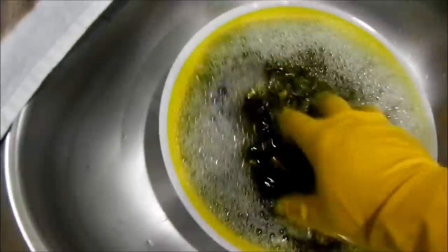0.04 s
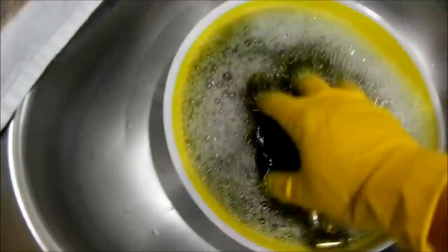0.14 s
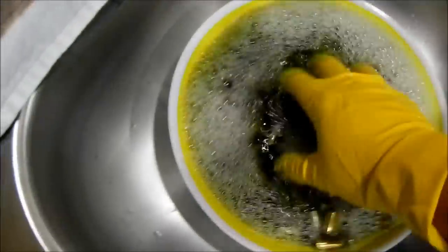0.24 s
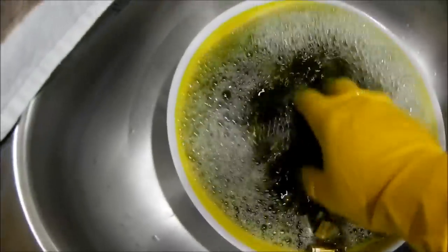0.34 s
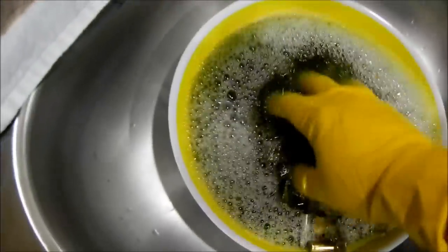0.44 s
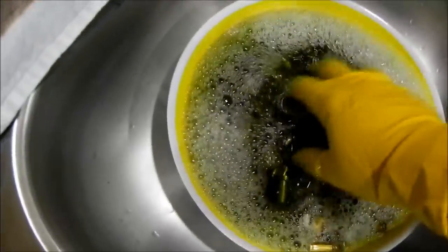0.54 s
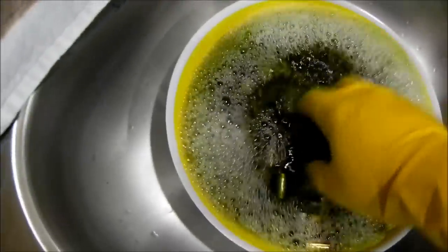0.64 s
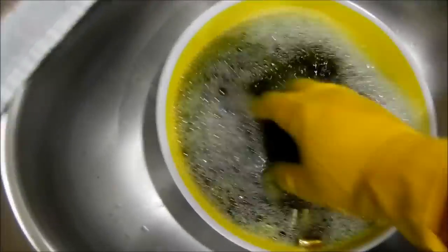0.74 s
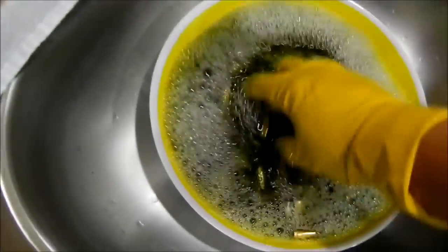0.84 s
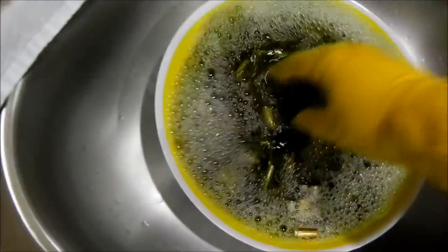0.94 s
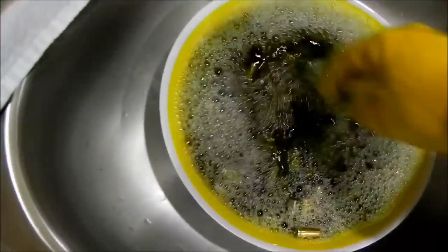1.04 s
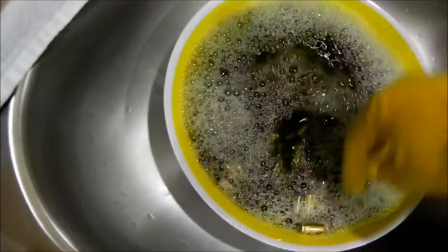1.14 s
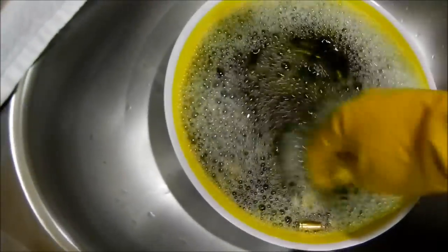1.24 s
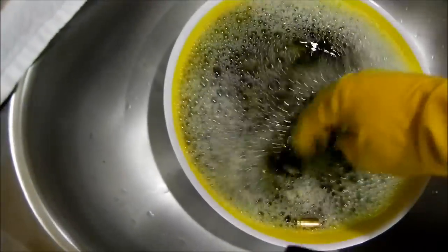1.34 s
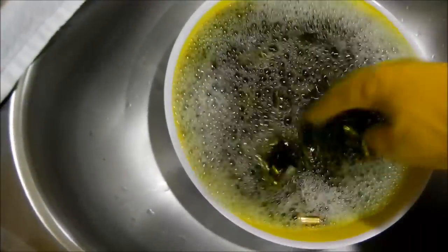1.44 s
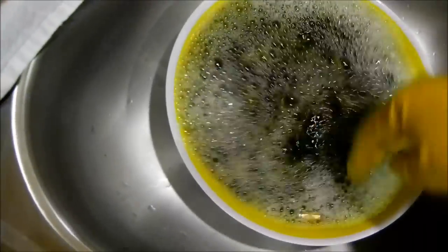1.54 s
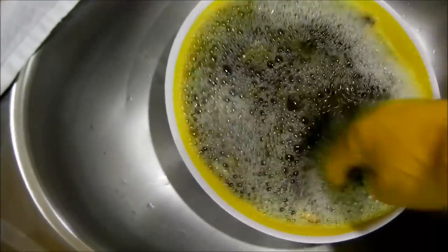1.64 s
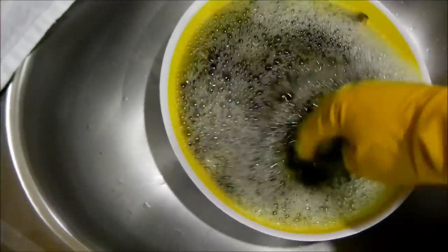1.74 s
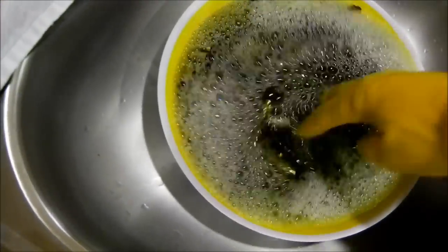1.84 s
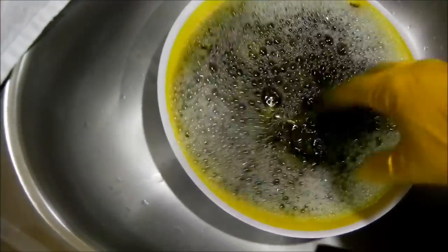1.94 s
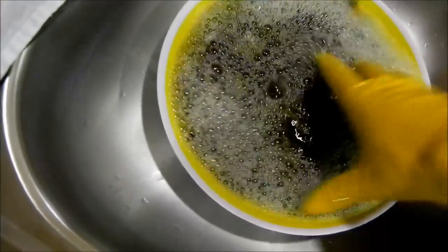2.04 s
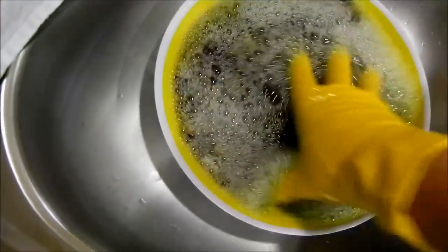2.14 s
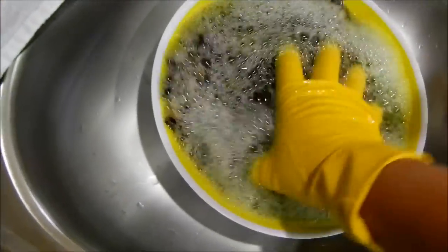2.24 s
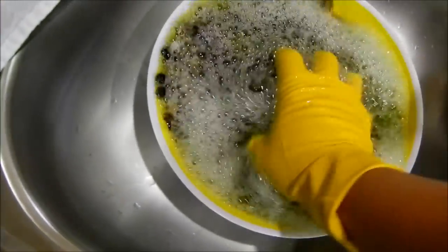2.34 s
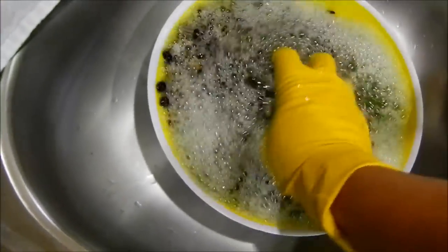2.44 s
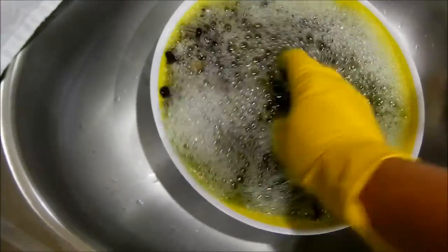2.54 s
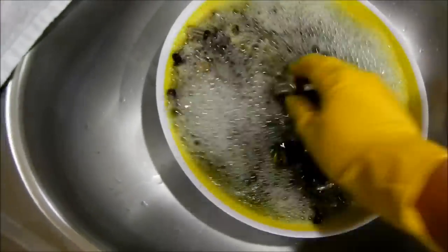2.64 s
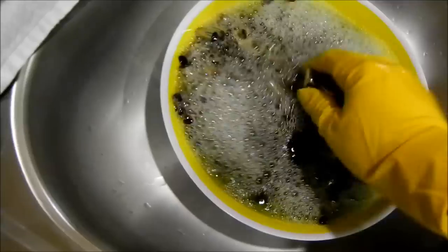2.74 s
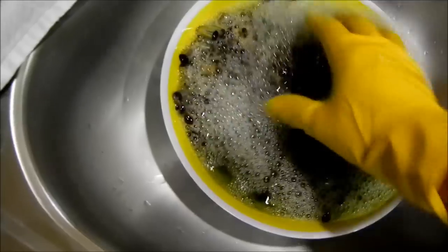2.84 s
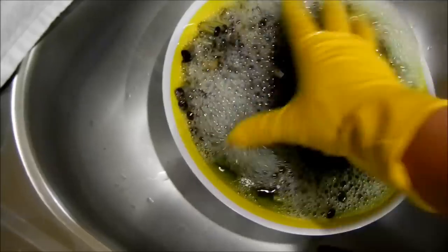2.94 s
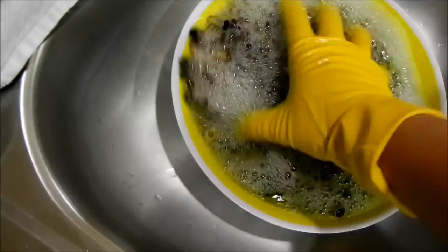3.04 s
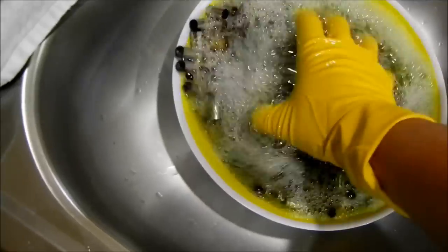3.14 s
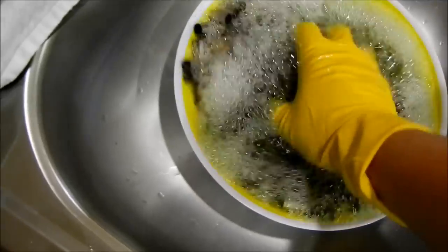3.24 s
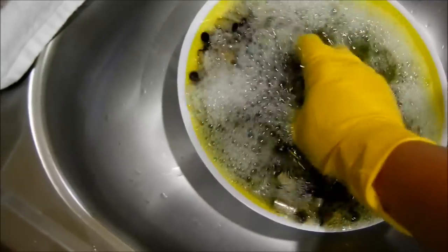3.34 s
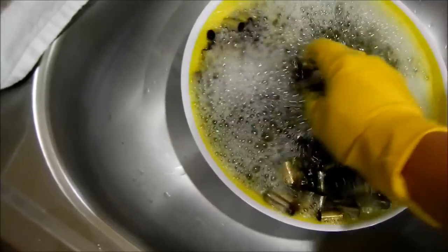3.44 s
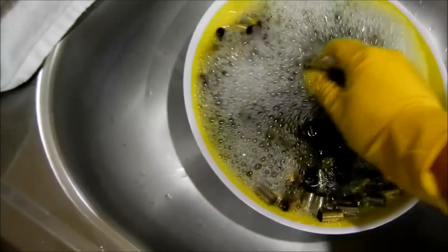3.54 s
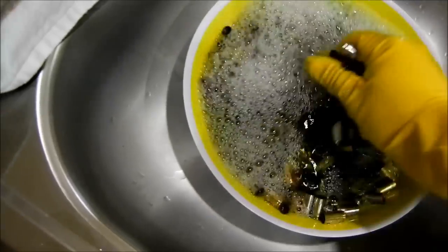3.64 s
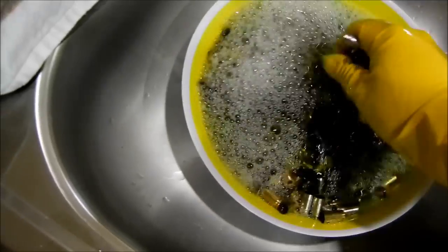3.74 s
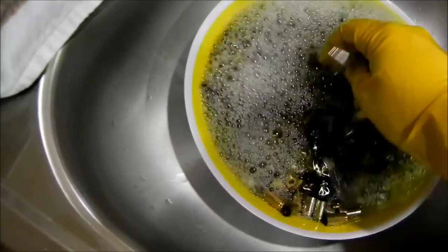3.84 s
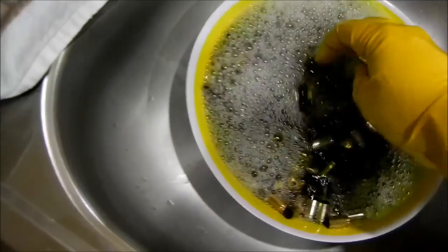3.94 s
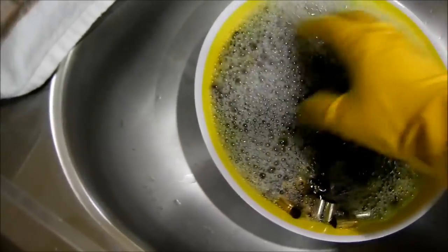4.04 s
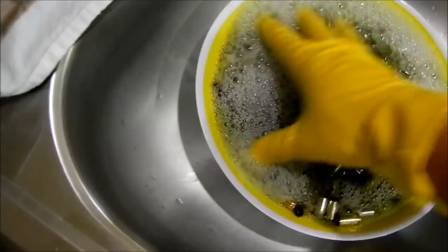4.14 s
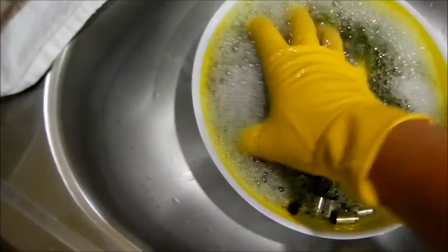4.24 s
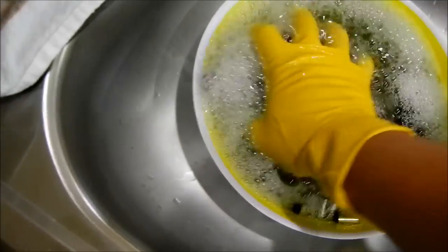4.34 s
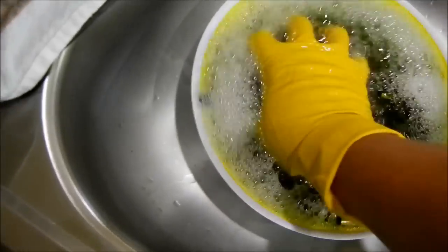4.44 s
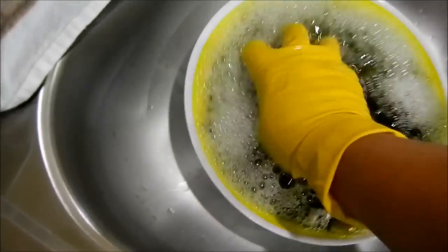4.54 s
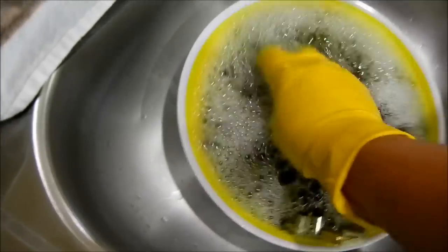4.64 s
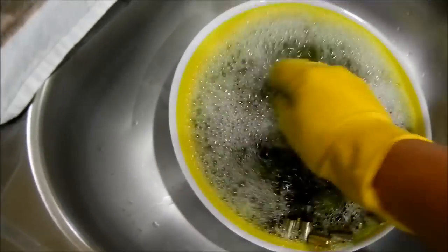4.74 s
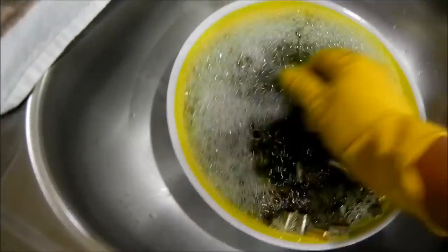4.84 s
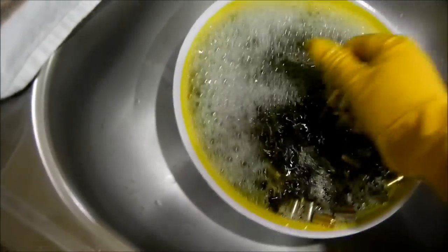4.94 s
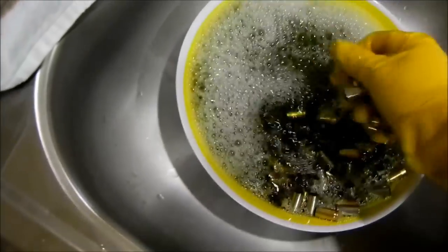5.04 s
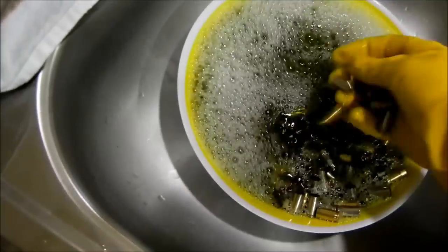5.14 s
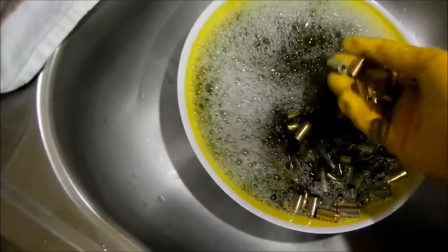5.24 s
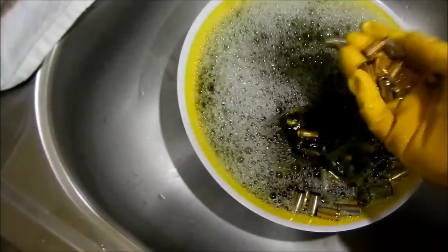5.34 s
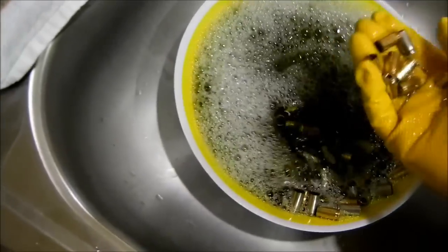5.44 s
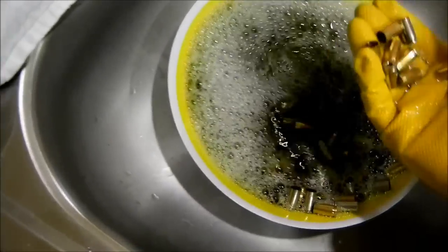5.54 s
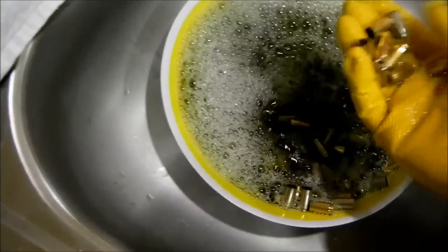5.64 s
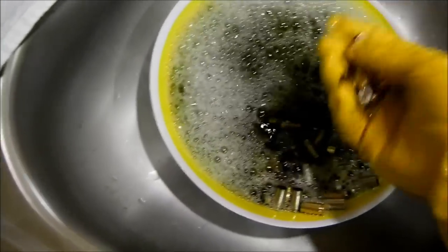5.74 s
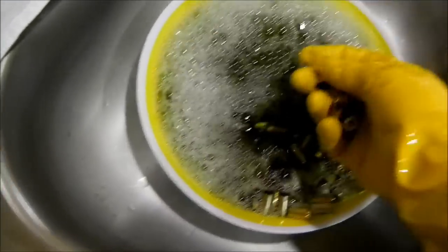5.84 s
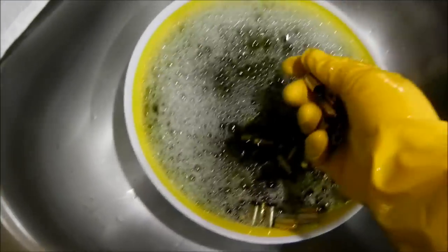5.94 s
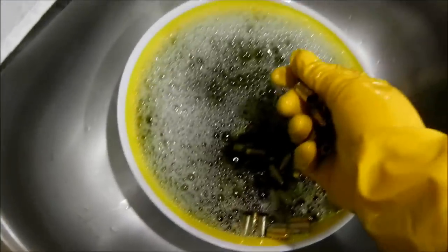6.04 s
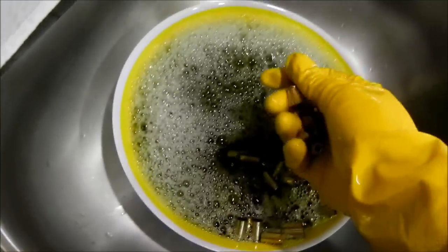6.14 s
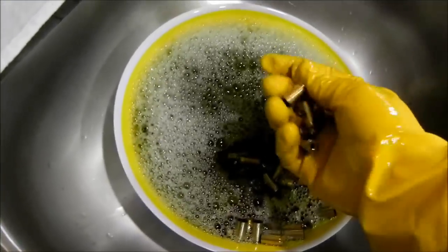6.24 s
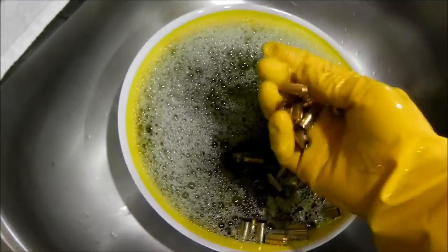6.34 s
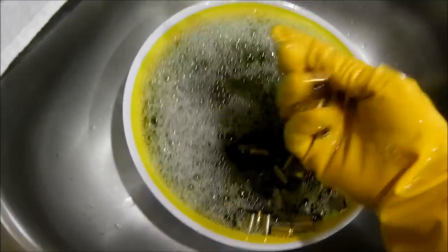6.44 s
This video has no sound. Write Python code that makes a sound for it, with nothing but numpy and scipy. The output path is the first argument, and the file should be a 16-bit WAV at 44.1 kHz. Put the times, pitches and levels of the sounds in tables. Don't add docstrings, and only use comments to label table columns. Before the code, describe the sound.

Loud wet scrubbing of loose metal pieces fills the first five seconds, crunchy and dense, with low bumps of the bowl on the sink floor and a short steel echo. Tubes clatter back into water, then lifted ones drop with crisp clinks and short high rings. It ends nearly quiet, with small clicks, a soft roll and low room hum, heard very close.

```python
import sys
import numpy as np
from scipy import signal
from scipy.fft import rfft, irfft
from scipy.io import wavfile

SR = 44100
rng = np.random.default_rng(int(sys.argv[2]) if len(sys.argv) > 2 else 0)


def nominal_scale(level):
    x = np.asarray(level, float) / 20
    return 10 ** x


def generate_wav(signal):
    frames = np.transpose(np.atleast_2d(signal))
    scaled = np.clip(frames, -1, 1) * 32767
    pcm = np.round(scaled).astype(np.int16)
    wavfile.write(sys.argv[1], SR, pcm)


N = 286209

# start in seconds, rise in seconds, hold in seconds, force in dB.
PUSHES = [(-.02, 0.064, 0.011, -11), (0.079, 0.007, 0.017, -18.5), (0.106, 0.1, 0.054, -13),
          (0.237, 0.13, 0.32, -13.5), (0.686, 0.068, 0.15, -12), (0.885, 0.079, 0.22, -18),
          (1.287, 0.0054, 0.25, -11.5), (1.551, 0.075, 0.037, -21), (1.718, 0.0099, 0.11, -14.5),
          (1.76, 0.13, 0.041, -11.5), (1.931, .03, 0.14, -17), (2.149, 0.0097, .05, -11.5),
          (2.243, 0.035, 0.067, -12.5), (2.358, 0.028, 0.11, -15.5), (2.395, 0.35, .21, -14),
          (2.925, 0.0023, 0.014, -12.5), (2.95, 0.019, 0.0077, -19), (3.076, 0.066, 0.033, -12.5),
          (3.185, 0.011, .22, -12.5), (3.48, .05, .31, -15.5), (3.834, 0.011, .02, -17),
          (3.922, 0.013, .003, -18), (3.967, 0.0051, 0.015, -16), (4.017, 0.099, 0.017, -14),
          (4.163, 0.0047, 0.087, -17.5), (4.297, 0.12, 0.12, -14), (4.499, .21, 0.033, -12.5),
          (4.725, 0.047, 0.097, -17), (4.882, 0.019, 0.1, -19), (5.024, .01, 0.0062, -17)]
# time in seconds, motion in dB.
SETTLING = [(0, -29), (4.95, -28), (5.13, -24), (5.4, -28), (5.7, -31), (5.82, -36.5), (5.97, -49),
            (6.22, -56), (6.49, -37)]
# time in seconds, level in dB.
BARE_TUBES = [(0, -1), (1.2, -0.5), (2.1, 1), (2.5, 2.5), (2.8, -1), (3.1, -4.5), (3.4, 2), (3.9, -3),
              (4.5, 0), (4.75, 0.5), (5.1, 1), (6.49, -1)]
# frequency in Hz, density in dB per Hz.
BOWL_SPECTRUM = [(150, -31), (250, -29), (326, -16), (383, -20.5), (541, -13), (660, -6.5), (734, -9),
                 (861, -1), (1180, -8.5), (2040, 2), (3720, -3.5), (4850, -12.5), (6000, -13), (7800, -41),
                 (13200, -120)]
# frequency in Hz, density in dB per Hz.
BRASS_SPECTRUM = [(2650, -19.5), (4500, -0.5), (4970, -2.5), (7610, 2), (9620, -4.5), (11300, -10.5),
                  (14300, -11), (15600, -12.5)]
# frequency in Hz, density in dB per Hz.
KNOCK_SPECTRUM = [(100, -31), (250, -11), (400, -5), (800, 2), (1300, -7.5), (3000, -36)]
# time in seconds, peak in dB, bowl pitch in Hz, edge in dB.
UNDERWATER_CLACKS = [(0.02, -19, 2500, -14), (0.6107, 0.5, 2540, -8), (0.6803, 4.5, 2090, -10.5),
                     (1.0764, 3, 2780, -33), (1.1752, -3.5, 3620, -1.5), (1.1932, 2, 3750, -12),
                     (1.2907, 4, 1990, -22), (1.616, 1.5, 2100, -29), (1.6985, -10, 2240, 0.5),
                     (1.733, 2, 3000, -16), (2.0457, -2, 2020, -5), (2.0799, 3.5, 3170, -31),
                     (2.1227, 4, 2250, -31), (2.156, 4, 1860, -12), (2.2488, -9, 2580, 3),
                     (2.27, 1, 2400, -10), (2.561, 4, 2120, -10), (2.9282, 5, 2120, -25),
                     (2.986, 6.5, 2290, -18), (3.035, -5, 1900, -14), (3.119, -1.5, 2270, -7),
                     (3.5229, -1, 2320, -5)]
# time in seconds, peak in dB, bowl pitch in Hz, edge in dB.
TUMBLE = [(3.7963, -4.5, 2240, -6.5), (3.8273, -1, 1690, -19), (3.8477, 0, 1740, -10),
          (3.8931, 0, 2550, -20), (3.9235, -6, 1810, -16), (3.9709, 4.5, 2250, -14), (4.0039, 1, 1820, -9),
          (4.024, 2.5, 1420, -16), (4.0328, 6, 2680, -16), (4.04, 4, 2270, -9), (4.0597, -0.5, 3300, -14),
          (4.1001, 5.5, 2080, -11), (4.1627, -1, 2070, -18), (4.173, 6, 1630, -11.5),
          (4.1835, 1, 2000, -16), (4.2014, 4.5, 1760, -16), (4.2428, 4, 2450, -20),
          (4.2508, 5.5, 3590, -12.5), (4.2738, -9, 1890, -26), (4.2967, -24, 1850, -11),
          (4.3147, -11, 2340, -1), (4.3361, -5, 1970, -6), (4.3875, -1, 2300, -6), (4.4194, -12, 2400, 4),
          (4.6499, -12, 2060, -18), (4.6868, 0, 2700, -7), (4.815, -7, 2760, -20), (4.9208, 0.5, 2430, -18),
          (4.9303, 0, 2030, -19), (4.9757, -2, 2280, -15)]
# time in seconds, peak in dB, bowl pitch in Hz, edge in dB.
DROPS = [(5.138, -16, 3150, -10), (5.1698, 5, 2590, -15), (5.1822, 2, 2650, -10), (5.19, 5, 2900, -12),
         (5.217, -1, 2070, -15), (5.2303, -3.5, 2040, -20), (5.2712, 2, 3560, -24),
         (5.296, -4.5, 1940, -12), (5.3196, -5.5, 2630, -12), (5.3562, -3, 1950, -6),
         (5.3573, 2, 2870, -7.5), (5.3802, -5.5, 2040, -17), (5.4034, -9, 2580, -14),
         (5.448, 2, 3570, -9.5), (5.448, -4.5, 2140, -20), (5.462, -6, 2310, -10), (5.4899, -18, 2120, -10),
         (5.511, 2.5, 2760, -9.5), (5.571, -10.5, 2440, -19), (5.6005, 3.5, 2280, -7)]
# time in seconds, peak in dB, pitch in Hz, edge in dB.
HELD = [(5.6685, -11, 2090, -17), (5.683, -2.5, 2920, -20), (5.7194, -11.5, 2180, -10),
        (5.733, -8, 2200, -26), (5.7502, -9, 2660, -14), (5.7987, -13.5, 1820, -12),
        (5.8195, -25, 2480, -14), (5.8413, -33, 3380, -1), (5.8511, -9.5, 3850, -25),
        (5.8656, -15, 2100, -22), (5.8902, -13, 2040, -26), (5.911, -18, 2930, -13),
        (5.9419, -25, 2580, -12), (5.9773, -22, 1350, -17), (6.026, -17.5, 1990, -17),
        (6.137, -15.5, 2020, -36), (6.1425, -15, 2300, -29), (6.1519, -17, 3610, -21),
        (6.1522, -20, 3520, -7), (6.1938, -39, 2170, 16), (6.1944, -8, 1940, -23), (6.211, -17, 2100, -22),
        (6.246, -23, 2310, -13), (6.347, -16, 2150, -12), (6.401, -13, 1940, -11),
        (6.4279, -11.5, 1940, -15)]
# time in seconds, peak in dB, frequency in Hz, t60 in seconds.
RINGS = [(3.875, -11.5, 8750, 0.03), (3.989, -14, 10200, 0.038), (4.0044, -1.5, 9380, 0.027),
         (5.0325, -16, 9050, 0.05), (5.177, -12, 10100, 0.05), (5.247, -14, 10800, 0.091),
         (5.272, -21, 11000, 0.061), (5.3053, -21, 10400, 0.05), (5.4246, -26, 10600, 0.063),
         (5.447, -16.5, 10940, 0.07), (5.5573, -21, 8450, 0.044), (5.842, -18, 10760, 0.026),
         (6.4, -33, 10800, 0.06), (6.1529, -10, 11700, 0.022), (6.1948, -15.5, 11100, 0.043),
         (6.345, -18, 11100, 0.025), (6.4268, -28, 10800, 0.05), (6.44, -22, 11200, 0.088),
         (6.4854, -26, 11300, 0.05)]
# time in seconds, peak in dB, frequency in Hz, t60 in seconds.
GULPS = [
    (4.1006, -17, 2110, 0.033),
    (4.1925, 5.5, 1830, 0.04),
    (4.2026, 5, 1710, 0.048),
    (4.2736, 13.5, 1886, 0.019),
    (5.139, -2.5, 3240, 0.053),
    (5.1507, -5, 3005, 0.081),
    (5.8507, -13, 4030, 0.017),
    (5.8644, -19, 2020, 0.04),
    (5.89, -17, 1880, 0.031),
    (6.3864, -17, 1390, 0.066),
]
# time in seconds, level in dB.
SHOVES = [(0, -30), (.57, -33), (1.17, -37.5), (1.36, -33), (1.9, -40), (2.29, -42), (2.72, -38),
          (2.88, -38), (3.3, -58), (3.73, -40), (4.1, -42), (4.51, -34.5), (4.65, -41), (4.93, -35.5),
          (5.2, -39), (5.5, -45), (5.72, -45)]
# frequency in Hz, density in dB per Hz.
SINK_SPECTRUM = [(15, -44), (25, -51), (43, -72), (75, -7), (107, -7.5), (150, -1.5), (182, 12),
                 (252, -5.5), (330, -20), (430, -46), (730, -120)]
# frequency in Hz, t60 in seconds.
BASIN_T60 = [(300, 0.34), (2000, 0.054), (10000, 0.078)]
# frequency in Hz, density in dB per Hz.
ROOM_SPECTRUM = [(18, -38), (30, -13), (233, 3.5), (355, -4), (616, -4), (844, -7), (2120, -3.5),
                 (4910, -18), (14000, -25), (16000, -24)]
# frequency in Hz, level in dB rms.
HUM = [(120, -55.5), (242, -55.5)]
# frequency in Hz, side minus mid in dB.
WIDTH = [(40, -19), (110, -20), (200, -21), (380, -21), (700, -17.5), (1290, -17), (2380, -13), (4400, -11),
         (8120, -7.5), (15000, -5.5)]


def unit(x):
    return x / np.sqrt(np.mean(x ** 2) + 1e-20)


def along(points, hz):
    point_hz, value = np.transpose(points)
    return np.interp(np.log(hz + 1), np.log(point_hz + 1), value)


def curves(rows):
    s, *columns = np.transpose(rows)
    return [np.interp(np.arange(N) / SR, s, column) for column in columns]


def joined(*levels_db):
    return 10 * np.log10(np.sum([nominal_scale(2 * db) for db in levels_db], axis=0) + 1e-12)


def coloured(x, points, size=8192):
    gain = nominal_scale(along(points, np.fft.rfftfreq(size, 1 / SR)))
    cepstrum = irfft(np.log(gain + 1e-5))
    cepstrum = np.r_[cepstrum[0], 2 * cepstrum[1:size // 2], np.zeros(size // 2)]
    pulse = irfft(np.exp(rfft(cepstrum)))
    return signal.fftconvolve(x, pulse[None] / np.linalg.norm(pulse), axes=1)[:, :N]


def placed(s, shapes):
    at = np.round(s * SR).astype(int)[:, None] + np.arange(shapes.shape[1])
    return np.bincount(at.ravel(), shapes.ravel(), N + SR)[:N]


def fading(db, t60_s, rise_s, size):
    t = np.arange(size) / SR
    decay = nominal_scale(db[:, None] - 60 * t / np.reshape(t60_s, (-1, 1)))
    return t, decay * (1 - np.exp(-t / rise_s))


def bursts(s, db, t60_s, rise_s, size=640):
    _, fade = fading(db, t60_s, rise_s, size)
    noise = rng.standard_normal((len(s), 2, size))
    return np.array([placed(s, fade * noise[:, 0]), placed(s, fade * noise[:, 1])])


def tones(s, db, hz, t60_s, rise_s=0.000091, size=640):
    t, fade = fading(db, t60_s, rise_s, size)
    ring = fade * np.sin(2 * np.pi * hz[:, None] * t)
    lean = rng.uniform(-2.1, 1.75, len(s))
    return np.array([placed(s, ring), placed(s, lean[:, None] * ring)])


def pushing(size=32):
    rise_db, sag_db_per_s = 9.5, 10.5
    let_go_s, linger = 0.036, 0.32
    t = np.arange(0, N + size, size) / SR
    force = []
    for start_s, rise_s, hold_s, db in PUSHES:
        u = (t - start_s) / rise_s
        climb_db = np.where(u < 0, -200, rise_db * (np.minimum(u, 1) - 1))
        held_s = np.maximum(t - start_s - rise_s, 0)
        release_db = 20 * np.maximum(held_s - hold_s, 0) / (let_go_s + linger * hold_s)
        force.append(db + climb_db - sag_db_per_s * held_s - release_db)
    return curves(np.transpose([t, joined(*force)]))[0]


def grind(rate_hz=1000, spread_db=4.5):
    force_db, loose_db = pushing(), curves(SETTLING)[0]
    grind_db = joined(force_db, loose_db)
    scratch_db = -23.5 + curves(BARE_TUBES)[0] + 1.25 * (joined(force_db, loose_db - 2) + 15)

    count = int(rate_hz * N / SR)
    chance = rng.random((count, 4))
    s = (np.arange(count) + 3 * chance[:, 0]) / rate_hz
    size_db = spread_db * np.clip(rng.standard_normal(count), -2, 2)

    thud = bursts(s, size_db, 0.011 + 0.054 * chance[:, 2], rise_s=0.00064, size=400)
    pitch_hz = 1500 * 2 ** (1.4 * chance[:, 3] ** 1.29)
    note = tones(s, 0.74 * size_db, pitch_hz, 0.0058 + 0.0063 * chance[:, 1], size=400)
    body = unit(coloured(thud, BOWL_SPECTRUM)) + nominal_scale(-11.0) * unit(note)

    scratch = bursts(s, 1.16 * size_db, 0.021 + 0.054 * chance[:, 1], rise_s=0.00029, size=300)
    few = slice(0, count, 6)
    ring_hz = 6500 + 3500 * chance[few, 3] ** 2
    ring = tones(s[few], 0.21 * size_db[few], ring_hz, 0.011 + 0.064 * chance[few, 2])
    edge = unit(coloured(scratch, BRASS_SPECTRUM)) + nominal_scale(-15.5) * unit(ring)
    return nominal_scale(grind_db - 0.62) * unit(body) + nominal_scale(scratch_db + 0.2) * unit(edge)


def strikes(s, db, hz, edge_db, t60_s, rise_s, knock_db):
    size = 1500
    crack = bursts(s, db + edge_db + 1.5, 0.004, 0.0001, size=300)
    thud = coloured(bursts(s, db - 9.5, t60_s, rise_s, size), BOWL_SPECTRUM)
    upper_hz = hz * (1.3 + 0.462 * rng.random(len(s)))
    notes = tones(s, db - 8, hz, 0.9 * t60_s, rise_s, size)
    notes = notes + tones(s, db - 8, upper_hz, 0.52 * t60_s, rise_s, size)
    knock = coloured(bursts(s, db + knock_db, 0.68 * t60_s, rise_s, size), KNOCK_SPECTRUM)
    edge = coloured(bursts(s, db + edge_db - 3.5, t60_s, 1.4 * rise_s, size), BRASS_SPECTRUM)
    return crack + thud + notes + knock + edge


def clacks():
    under = strikes(*np.transpose(UNDERWATER_CLACKS), t60_s=0.038, rise_s=0.00046, knock_db=-27)
    tumble = strikes(*np.transpose(TUMBLE), t60_s=0.024, rise_s=0.0012, knock_db=-16.5)
    return nominal_scale(-5.5) * under + tumble


def blow_t60(db, usual_s):
    return usual_s * np.exp(-0.01 * (db - db.mean()))


def clinks():
    drops, held = np.transpose(DROPS), np.transpose(HELD)
    dropped = strikes(*drops, blow_t60(drops[1], 0.025), rise_s=0.00069, knock_db=-17)
    return dropped + strikes(*held, blow_t60(held[1], 0.022), rise_s=0.00074, knock_db=-38)


def rings():
    s, db, hz, t60_s = np.transpose(RINGS)
    detune = rng.uniform(-0.86, 1, (len(s), 2))
    main = tones(s, db - 5, hz, t60_s, size=5000)
    other = tones(s, db - 4, hz * (1 + 0.047 * detune[:, 0]), 0.66 * t60_s, size=5000)
    slow = tones(s, db - 34, hz * (1 + 0.006 * detune[:, 1]), 1.8 * t60_s, size=5000)
    return main + other + slow


def gulps():
    s, db, hz, t60_s = np.transpose(GULPS)
    return tones(s, db - 7.5, hz, t60_s, rise_s=0.002, size=3000)


def roll(count=80):
    start_s, length_s, edge_s, level_db = 6.343, 0.12, 0.012, -23 - 13.5
    chance = rng.random((count, 3))
    s = start_s + (length_s + edge_s) * chance[:, 0]
    pitch_hz = 1650 * 2 ** (1.15 * chance[:, 2] ** 1.96)
    notes = tones(s, 8 * chance[:, 1], pitch_hz, 0.034, rise_s=0.0012, size=1500)
    after_s = np.maximum(np.arange(N) / SR - start_s - length_s, 0)
    return nominal_scale(level_db - 20 * np.minimum(after_s / edge_s, 1)) * notes


def sink(size=256):
    shove_width_s, slide_boom_db = 0.058, -13
    t = np.arange(0, N + size, size) / SR
    lumps_db = np.interp(t * 9, np.arange(80), rng.standard_normal(80))
    shoves = [db - 10 * np.log10(1 + ((t - s) / shove_width_s) ** 4) for s, db in SHOVES]
    shove_db, lumps_db = curves(np.transpose([t, joined(*shoves), lumps_db]))
    boom_db = joined(curves(SETTLING)[0] + slide_boom_db, shove_db)
    boom = unit(coloured(rng.standard_normal((2, N)), SINK_SPECTRUM))
    return nominal_scale(boom_db + 0.73 * lumps_db) * boom


def basin(x, size=8192):
    out, delay = np.zeros((2, N + SR)), 120
    for at in range(0, N, size):
        hz, t, z = signal.stft(rng.standard_normal((2, SR // 5)), SR, nperseg=256)
        decay = nominal_scale(-60 * t / along(BASIN_T60, hz)[:, None])
        tail = signal.istft(z * decay, SR, nperseg=256)[1]
        wet = signal.fftconvolve(x[None, at:at + size], tail / np.linalg.norm(tail[0]), axes=1)
        out[:, at + delay:at + delay + wet.shape[1]] += wet
    return out[:, :N]


def room():
    t = np.arange(N) / SR
    drift = np.cumsum(rng.standard_normal(N)) * 0.0117
    hum = sum(nominal_scale(db + 2.5) * np.sin(2 * np.pi * hz * t + drift) for hz, db in HUM)
    air = nominal_scale(-44.5 + 2.0) * coloured(rng.standard_normal((2, N)), ROOM_SPECTRUM)
    return air + np.array([hum, 0.46 * hum])


def scene():
    brass = grind() + clacks() + clinks() + rings() + gulps() + roll()
    mid, side = brass + nominal_scale(-11.0) * basin(brass[0]) + sink() + room()
    side = irfft(rfft(side) * nominal_scale(along(WIDTH, np.fft.rfftfreq(N, 1 / SR))), N)
    return np.array([mid + side, nominal_scale(0.03) * (mid - side)])


def low_pass(x):
    return signal.sosfilt(signal.butter(12, 16100, fs=SR, output="sos"), x)


def record(dry):
    bass_hz, top_hz = 45, 15750
    ceiling, hardness = 1.05, 5
    hz = np.fft.rfftfreq(N, 1 / SR)
    kept = irfft(rfft(dry) * 1j * hz / (bass_hz + 1j * hz), N)
    squeezed = kept / (1 + np.abs(kept / ceiling) ** hardness) ** (1 / hardness)
    mix = irfft(rfft(squeezed) * (hz < top_hz), N)
    return low_pass(np.clip(mix, -1, 1))


dry = scene()
out = record(dry)
generate_wav(out)
```